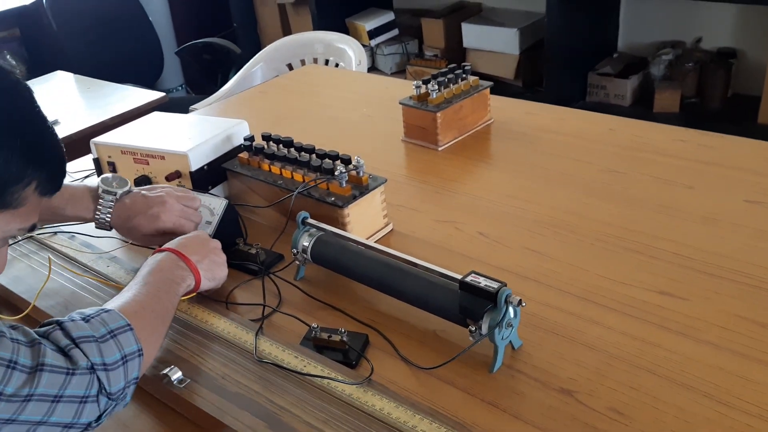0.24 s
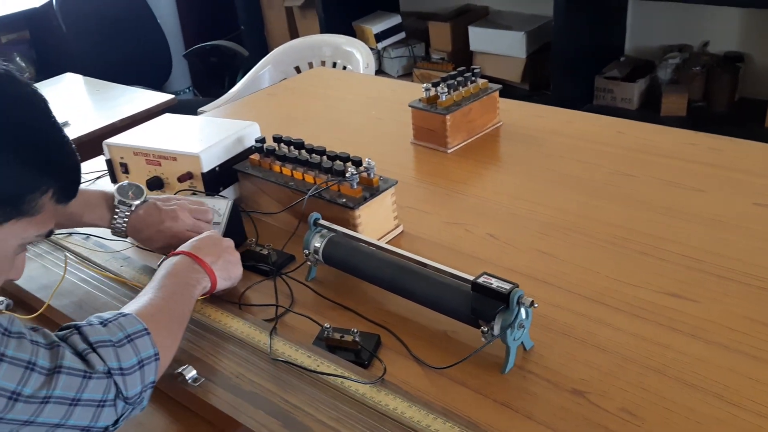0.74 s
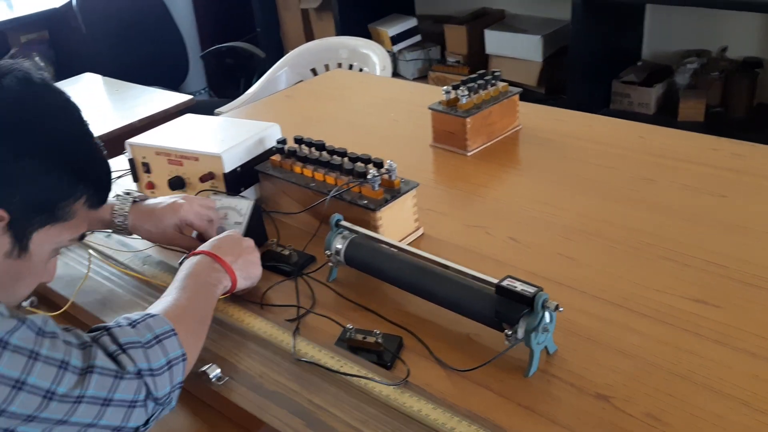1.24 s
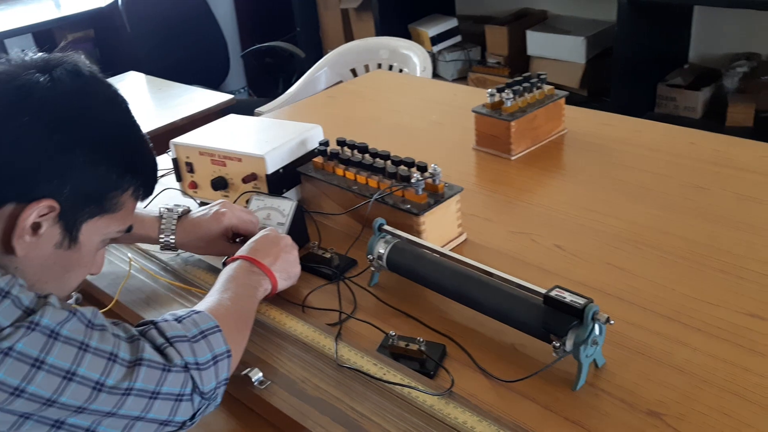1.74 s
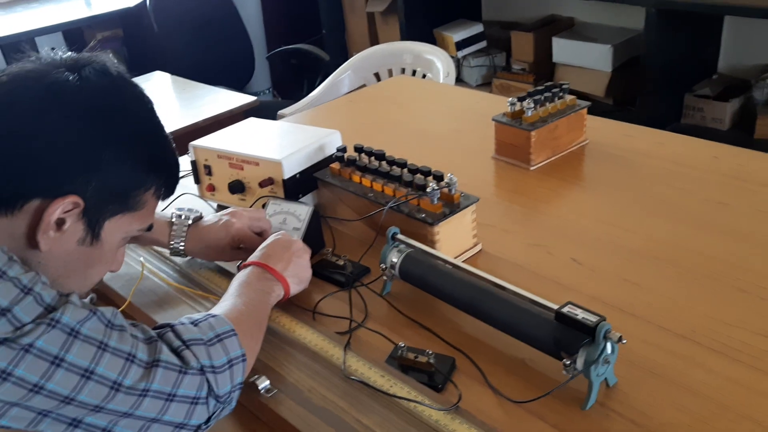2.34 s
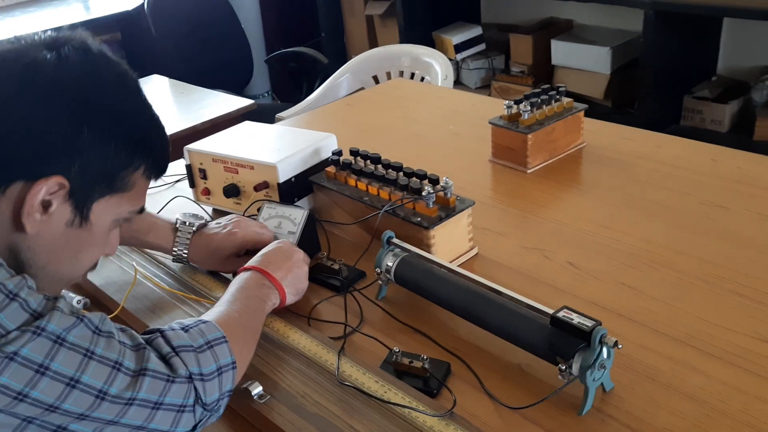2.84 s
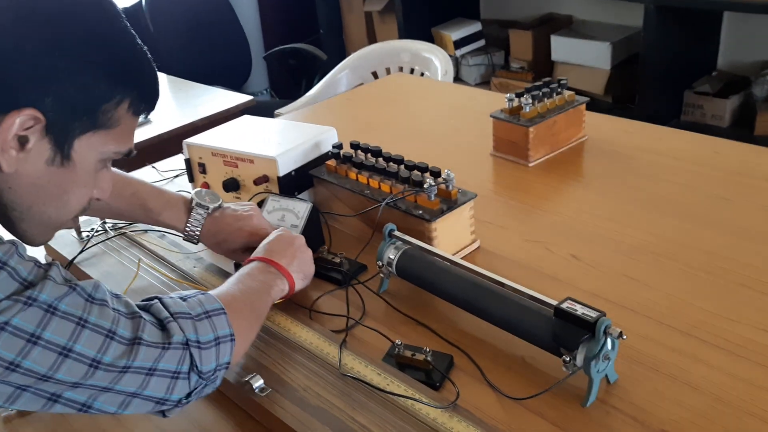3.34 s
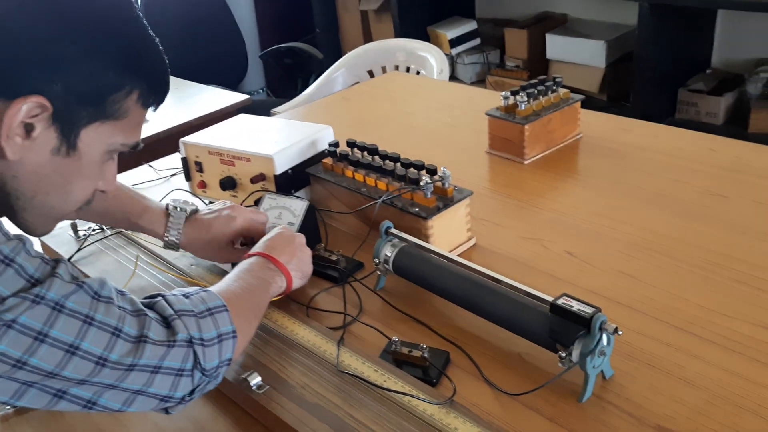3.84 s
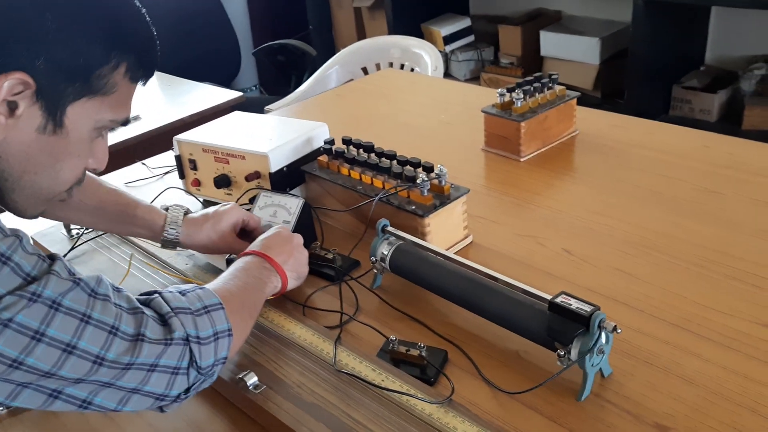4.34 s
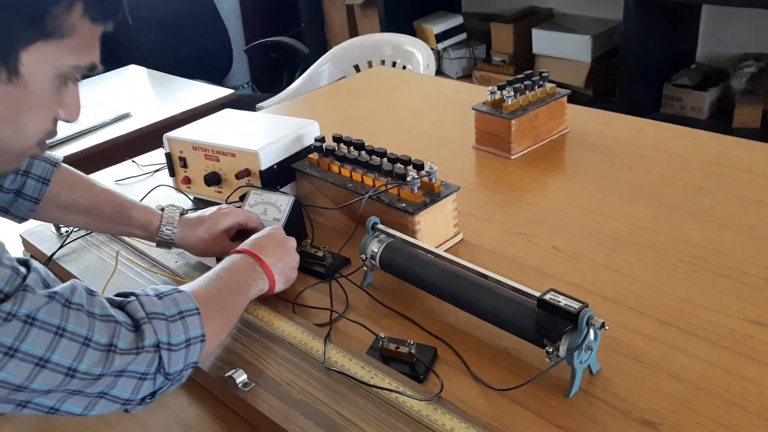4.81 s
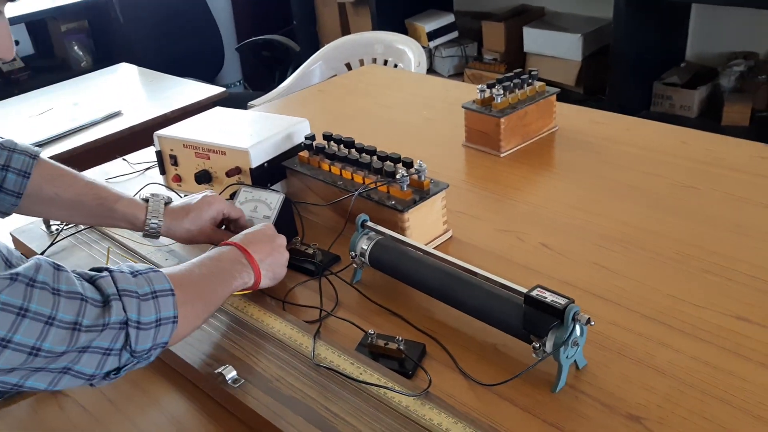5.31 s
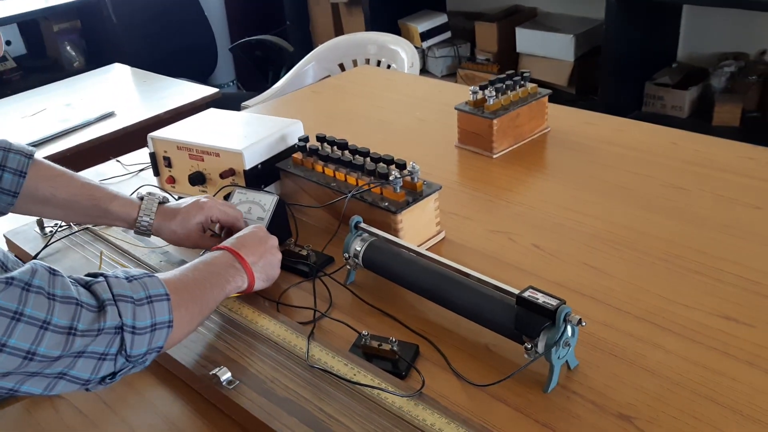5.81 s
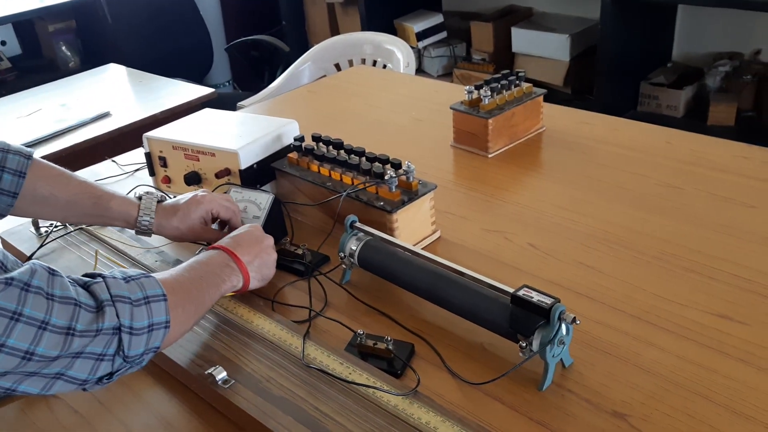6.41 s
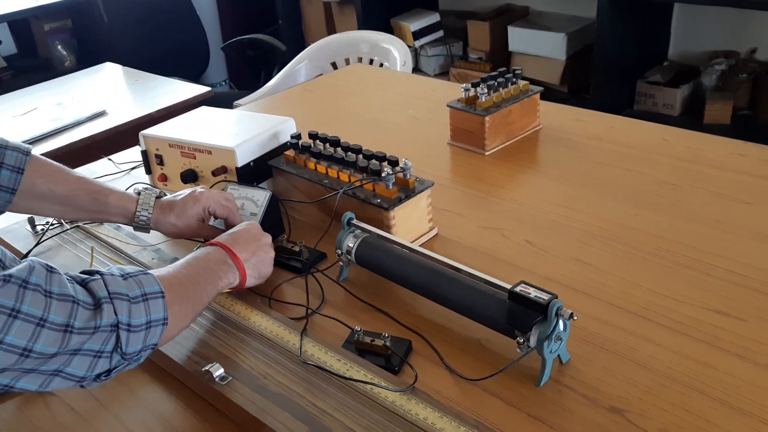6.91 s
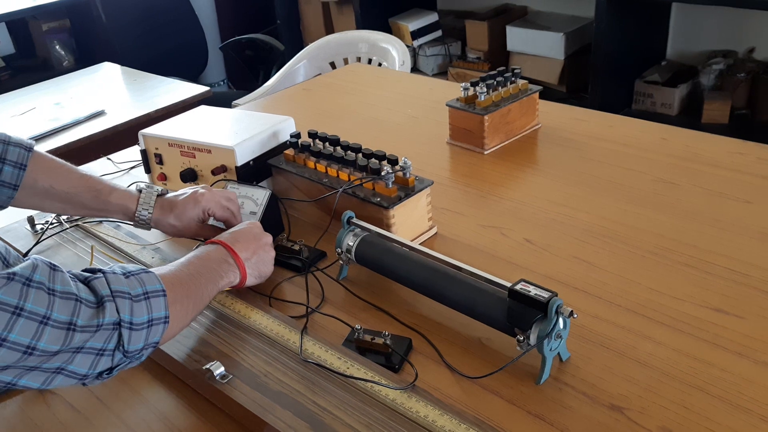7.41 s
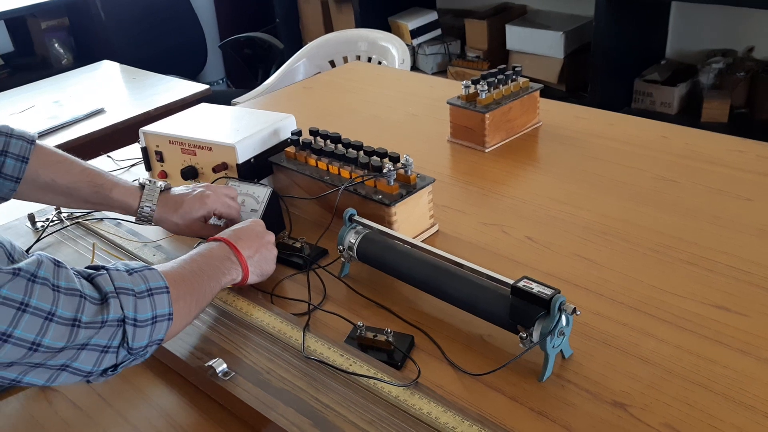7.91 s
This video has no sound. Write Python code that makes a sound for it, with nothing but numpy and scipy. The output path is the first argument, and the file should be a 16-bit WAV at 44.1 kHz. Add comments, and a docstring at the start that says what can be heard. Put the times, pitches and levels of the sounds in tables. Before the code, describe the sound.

Small metal clinks, wooden knocks and sleeve rustles as hands fit a wire, with one stool squeal and short rubber sole chirps.

```python
"""Hands fit a wire to a brass terminal on a wooden bench, near one microphone in a large bare laboratory.
Knuckles knock the boards, wire ends clink on the brass, sleeves rustle and arms drag, and each movement stirs a
low rumble. Down on the floor a stool leg squeals once and rubber soles chirp as they stick and slip. The far
walls answer the taps and squeaks; from outside comes a thin, distant squeal, over a steady hush."""
import sys
import numpy as np
from scipy import signal
from scipy.fft import rfft, irfft
from scipy.io import wavfile
from scipy.ndimage import uniform_filter1d

SR = 44100
rng = np.random.default_rng(int(sys.argv[2]) if len(sys.argv) > 2 else 0)


def to_wav(s):
    """Save 16-bit WAV."""
    ch = np.atleast_2d(s).T  # columns
    pcm = np.round(np.clip(ch, -1, 1) * 32767)  # PCM
    wavfile.write(sys.argv[1], SR, pcm.astype(np.int16))


N = 359415
T = np.arange(N) / SR

# wire ends on the terminal: t/s, clink level/dB, clink centre f/Hz, snap level/dB, top level/dB
WIRE_CLICKS = [(.1, -41.5, 1580, -46, -76), (0.3027, -62, 1570, -65.5, -65), (0.698, -24.5, 1800, -52, -55),
               (1.254, -45, 1650, -72, -80), (1.589, -63, 1846, -61, -66),
               (1.6103, -45, 1680, -42.5, -32.5), (1.649, -60, 1734, -62, -75),
               (1.7743, -60, 1683, -62, -78), (1.945, -60, 1985, -57, -62),
               (1.9693, -61, 2600, -48.5, -43.5), (2.092, -53, 2370, -46.5, -65),
               (2.2876, -59.5, 1657, -61, -75.5), (2.6905, -43, 1740, -39.5, -64),
               (2.7048, -44, 1603, -55, -54), (2.7214, -47, 1630, -45, -58),
               (2.811, -49.5, 2260, -62.5, -77.5), (3.1908, -67.5, 1840, -69, -70),
               (3.3565, -56, 2060, -58.5, -49), (3.411, -64, 2127, -61, -55.5),
               (3.4793, -49.5, 1810, -61, -54.5), (3.5354, -72, 1800, -65.5, -50.5),
               (3.6029, -57.5, 2400, -82, -90), (3.714, -59, 1940, -72.5, -60),
               (3.884, -49, 2780, -72, -83.5), (4.087, -61, 1997, -81.5, -88),
               (4.112, -55.5, 2690, -88, -85), (4.375, -51, 1850, -71, -73),
               (4.722, -70, 1564, -64.5, -59.5), (4.7587, -71, 2065, -64.5, -72),
               (4.8694, -62.5, 2110, -72.5, -84), (5.067, -55, 2600, -85, -69.5),
               (5.1363, -53, 2260, -62, -56), (5.2095, -44.5, 1750, -58, -62), (5.431, -49, 1910, -71, -70),
               (5.4524, -70, 1600, -65, -71), (5.7166, -39, 2200, -49, -74), (5.7446, -49, 2137, -58, -77),
               (5.7734, -70, 2160, -59, -76.5), (6.11, -56, 2100, -75, -85),
               (6.2637, -60.5, 2190, -63, -89), (6.409, -59.5, 1910, -71.5, -85),
               (6.5121, -64, 2120, -81.5, -88), (6.5595, -62, 2272, -74, -84),
               (7.0445, -60.5, 2043, -76, -76.5), (7.3144, -61.5, 1960, -68.5, -58),
               (7.3627, -62, 2226, -78.5, -63), (7.4988, -61, 1600, -76, -85),
               (7.5565, -55, 2215, -67.5, -69.5), (7.9455, -69, 2170, -78, -65.5),
               (8.053, -47, 2170, -58.5, -72)]
# low and high modes of the brass: f/Hz, level/dB, t60/s
BRASS_LOW_MODES = [(1600, 0.5, 0.013), (1805, 2, .025), (2165, 0.5, .04), (2540, -2.5, 0.0072),
                   (2860, 1, 0.016)]
BRASS_HIGH_MODES = [(4300, -1, .004), (4820, 2, .005), (5500, 2, .005), (6318, 0, .004), (7940, -4, .004)]


def terminal_clicks():
    """Near the microphone, wire ends strike brass: ringing modes and short cracks of noise."""
    s, clink_db, clink_hz, snap_db, top_db = np.transpose(WIRE_CLICKS)
    at = np.round(s * SR).astype(int)
    clink = strike(at, clink_db - 1, BRASS_LOW_MODES, roll_s=.004, centre_hz=clink_hz, db_per_octave=36)
    clink += crack(at, clink_db - 1, t60=.03)
    snap = strike(at, snap_db, BRASS_HIGH_MODES, roll_s=.0038)
    snap += crack(at, snap_db + 10.5, t60=.025)
    top = crack(at, top_db + 5, t60=.012)
    return band(clink, 1100, 3300) + band(snap, 3600, 7300) + band(top, 9000, 16000)


# blows on the bench: t/s, thud level/dB, thud centre f/Hz, wood level/dB, wood centre f/Hz
BENCH_KNOCKS = [(.1, -35.5, 143, -37.5, 725), (0.3016, -68, 285, -53, 573),
                (0.3692, -56, 69.6, -67.5, 554.2), (.7, -35.5, 153, -30, 790),
                (0.9276, -57, 86, -44.5, 354), (1.252, -36, 283, -25.5, 483),
                (1.497, -48.5, 280, -39.5, 416), (1.589, -51, 285, -47.5, 596),
                (1.6104, -58, 283, -43.5, 710), (1.649, -56, 299, -37.5, 354), (1.702, -53, 165, -42, 1060),
                (1.773, -47.5, 100, -57, 653), (1.9696, -68, 274, -55.5, 449), (2.0699, -45, 135, -58, 414),
                (2.0907, -43.5, 144, -51, 520), (2.2891, -52.5, 261.2, -62.5, 322),
                (2.4493, -39, 266, -71, 305), (2.5299, -41, 264, -70, 337), (2.69, -27.5, 299, -24.5, 400),
                (2.7054, -23, 82, -47, 344), (2.72, -46, 61.6, -40, 377), (2.811, -37, 65, -35, 332),
                (2.9571, -47, 163, -46.5, 386), (3.1528, -58, 153, -53, 342.4),
                (3.1899, -50.5, 74.3, -54.5, 369), (3.335, -55, 182, -45, 480), (3.4423, -58, 70, -42, 575),
                (3.8812, -46.5, 149, -46.5, 358), (4.086, -59, 273, -54.5, 628),
                (4.1116, -54, 286, -51, 533), (4.376, -59, 295, -45.5, 520), (4.721, -46, 152.4, -61, 319),
                (4.7587, -47, 107, -64, 304), (4.8687, -50.5, 108, -57, 646), (5.1363, -52, 70, -45, 550),
                (5.2099, -53.5, 94, -50, 657), (5.422, -56, 131.3, -36.5, 520),
                (5.4524, -53, 167, -42, 614), (5.7164, -55, 212, -52, 986), (5.745, -47, 129, -47, 475),
                (5.7734, -48.5, 113, -65, 450), (6.41, -70, 64.6, -53, 674), (6.5586, -51, 221, -53, 355),
                (6.5998, -53.5, 231, -57, 555), (7.0432, -59, 81, -55, 540), (7.363, -63, 67.7, -57.5, 454),
                (7.5569, -60.5, 189, -48, 534), (8.0514, -55, 210, -49.5, 610),
                (8.078, -53.5, 271, -45, 345)]
# low and middle modes of the bench: f/Hz, level/dB, t60/s
BENCH_LOW_MODES = [(61, -1, 0.24), (77, 0.5, 0.36), (97.9, -1.5, 0.29), (151, 3.5, 0.19), (198, -2, .12),
                   (214, -0.5, 0.09), (252.9, 2.5, 0.036), (288.2, 1, 0.14)]
BENCH_MID_MODES = [(330.6, 0.5, 0.07), (354, -2.5, 0.2), (417, -1.3, 0.099), (470, 1.8, 0.057),
                   (546.9, 2.4, .08), (610, -0.75, 0.088), (687, -1.4, 0.1), (795.4, 1.8, 0.05),
                   (874, -4.2, .06), (960.6, 0, 0.022), (1090, -0.2, 0.027)]


def bench_knocks():
    """Knuckles and apparatus knock the bench; the soft blows ring only the wood's modes."""
    s, thud_db, thud_hz, wood_db, wood_hz = np.transpose(BENCH_KNOCKS)
    at = np.round(s * SR).astype(int)
    thud = strike(at, thud_db - 1.5, BENCH_LOW_MODES, roll_s=.008, centre_hz=thud_hz, db_per_octave=12.5)
    wood = strike(at, wood_db - .5, BENCH_MID_MODES, roll_s=.002, centre_hz=wood_hz, db_per_octave=10.5)
    return band(thud, 40, 560) + band(wood, 310, 1400)


# sleeve and finger rubs: t/s, hold/s, cloth level/dB, finger level/dB, relative crackle level/dB
HAND_RUBS = [(0, 0.012, -69.5, -67.5, 4), (0.111, 0.0045, -68, -62.5, -12), (0.3, .005, -81.5, -90, .5),
             (0.506, 0.085, -80.5, -76, 9), (1.265, .005, -64.5, -65, -1), (1.598, 0.0048, -78.5, -79, 8.5),
             (1.96, 0.0046, -91.5, -74, -10), (2.099, 0.0022, -90, -80, -15),
             (2.108, 0.14, -79, -80.5, 0.5), (2.305, 0.027, -70.5, -76, 4.5), (2.7, 0.025, -64.5, -71, 0),
             (2.806, .045, -67, -67.5, -4), (2.952, 0.062, -70, -74.5, 1), (3.181, 0.012, -76.5, -72.5, -2),
             (3.265, 0.053, -63, -71, 6), (3.434, 0.21, -87.5, -85, 8), (4.346, 0.062, -80.5, -72, 2.5),
             (4.6, 0.29, -81, -83, 4), (5.11, 0.02, -67, -64.5, 0.5), (5.21, .01, -75, -65.5, 6.5),
             (5.42, .03, -80, -83, .5), (5.725, 0.029, -83, -81, -3), (5.962, 0.009, -86, -77, 0),
             (6.107, .005, -84, -71, -11), (6.681, .02, -85, -75.5, -0.5), (7.166, .01, -89, -77, 4),
             (7.319, 0.0046, -89, -81, 7.5), (7.555, 0.0049, -88, -82, -5), (8.031, 0.045, -80, -72.5, 7)]
# spectra of sleeve cloth and of crackling wire: f/Hz, density level/dB
CLOTH_SPECTRUM = [(1760, -42.5), (3000, -16), (3500, -1), (3800, -4.5), (4480, 0.5), (5860, 2),
                  (6460, -2.5), (7320, -1), (9500, -12.5), (12400, -40.5), (20900, -120)]
WIRE_SPECTRUM = [(6000, -27.5), (9000, -4.5), (12000, -2.5), (15800, 0)]


def rustle():
    """Close and dry: cloth rubs unevenly band by band, stiff wire crackles, fingers rub duller."""
    rest_db, rise_db_per_s, post_hz = -92.5, 1503.5, 2150
    s, hold_s, cloth_db, finger_db, crackle_db = np.transpose(HAND_RUBS)
    cloth = strokes(s, hold_s, cloth_db, rise_db_per_s, fall_db_per_s=189)
    skin = strokes(s, hold_s, finger_db, rise_db_per_s, fall_db_per_s=189)
    # every click on the terminal brings a brief rub too
    click_s, clink_db, _, snap_db, _ = np.transpose(WIRE_CLICKS)
    no_hold = np.zeros_like(click_s)
    brush = strokes(click_s, no_hold, snap_db - 21, rise_db_per_s, fall_db_per_s=300.5)
    touch = strokes(click_s, no_hold, clink_db - 18, rise_db_per_s, fall_db_per_s=300.5)
    rub = colour(grains(8000, spread_db=2.5), CLOTH_SPECTRUM)
    edges = np.geomspace(2600, 12000, 6)
    patchy = sum(amp(1.5 * drift(10)) * band(rub, low, high) for low, high in zip(edges, edges[1:]))
    crackle_gain = amp(loudest(cloth, crackle_db) - 13.5 + 1.7 * drift(25))
    crackle = crackle_gain * colour(grains(2500, spread_db=.5), WIRE_SPECTRUM)
    sleeves_and_wire = envelope(np.vstack([cloth, brush]), rest_db) * (rms_one(patchy) + crackle)
    dull = band(grains(3000, spread_db=2), 1250, 2800)
    post = amp(5) * resonate(dull, post_hz, width_hz=220)   # the terminal post colours the finger rubs
    fingers = envelope(np.vstack([skin, touch]), rest_db) * rms_one(dull + post)
    return amp(6.5) * sleeves_and_wire + fingers


# arms on the bench top: t/s, hold/s, level/dB, centre f/Hz
ARM_DRAGS = [(0, 0.0065, -47, 510), (.11, 0.049, -48.5, 450), (.75, 0.0077, -44.5, 780),
             (.91, 0.0057, -47.5, 406), (1.09, 0.098, -45, 265), (1.27, 0.1, -41.5, 330),
             (1.61, 0.063, -44.5, 420), (1.75, .05, -58, 450), (1.97, 0.15, -59.5, 350),
             (2.5, 0.092, -49.5, 265), (2.718, 0.12, -45, 397), (2.88, 0.15, -47, 340),
             (3.29, 0.091, -46.5, 612), (3.412, 0.057, -48, 630), (3.58, 0.22, -61, 450),
             (3.88, 0.076, -59, 300), (4.08, 0.068, -66.5, 570), (4.36, 0.025, -52, 480),
             (4.56, 0.17, -63, 280), (4.88, 0.008, -64, 447), (5.02, 0.054, -64, 600),
             (5.127, 0.09, -56, 590), (5.324, .05, -58.5, 600), (5.417, 0.055, -53.5, 595),
             (5.72, 0.075, -61, 470), (6.082, .12, -55.5, 577), (6.45, .13, -60, 400),
             (6.74, .01, -61, 362), (7.04, 0.058, -69.5, 560), (7.6, 0.0088, -64, 560),
             (7.88, .03, -60.5, 320), (8.029, .07, -55, 607)]


def arm_drags():
    """Arms drag on the bench near the microphone; the boards under them colour the rub."""
    s, hold_s, level_db, centre_hz = np.transpose(ARM_DRAGS)
    power = strokes(s, hold_s, level_db, rise_db_per_s=192, fall_db_per_s=131)
    drag_hz = loudest(power, centre_hz)
    rub = grains(3000, spread_db=2)
    edges = np.geomspace(190, 1300, 9)
    gains = [amp(-16 * np.abs(np.log2(low * 1.2 / drag_hz))) for low in edges[:-1]]
    drag = sum(gain * rms_one(band(rub, low, high)) for gain, low, high in zip(gains, edges, edges[1:]))
    drag /= np.sqrt(sum(gain ** 2 for gain in gains))
    return envelope(power, rest_db=-72.5) * amp(1.7 * drift(2.1)) * drag


# the stool leg's slide: t/s, slip f/Hz, squeal level/dB, frame level/dB, grit level/dB
STOOL_SLIDE = [(.54, 1800, -83, -70.5, -83), (.585, 1800, -70, -48.5, -67), (.61, 1800, -46, -29.5, -51),
               (.63, 1800, -24.5, -33.5, -40.5), (.655, 1800, -20, -35.5, -32),
               (.686, 1795, -21.5, -31, -35), (.693, 1790, -50, -28.5, -47.5),
               (.715, 1790, -71.5, -33.5, -51), (.735, 1790, -67.5, -52, -63.5)]
# harmonics of the squeal: multiple, level/dB
SQUEAL_HARMONICS = [(1, -1.5), (2, -16.5), (3, -16), (4, -22.5)]
# resonances of the stool frame: f/Hz, width/Hz, level/dB
FRAME_MODES = [(593, 130, -4.5), (762.2, 80, 3), (855, 41, 4), (1067.6, 7, -3.5), (1595, 110, -3),
               (1730, 90, -22), (2000, 130, -5.5), (3540, 22, -15), (3872, 73, -10.5), (4260, 130, -16),
               (4690, 71, -13.5), (5750, 70, -10.5), (7600, 200, -23)]
# spectrum of grit under the leg: f/Hz, density level/dB
GRIT_SPECTRUM = [(1350, -42.5), (2300, -18), (2680, -20), (3480, -3), (5070, -7.5), (5530, -4.5),
                 (6090, -8.5), (9520, -20.5), (13200, -20.5), (15500, -29.5)]


def stool_squeal():
    """A stool leg sticks and slips at a near-steady rate; the rough floor grates and shakes the frame."""
    hz, squeal_db, frame_db, grit_db, on = in_time(STOOL_SLIDE)
    phase = 2 * np.pi * np.cumsum(hz * (1 + .0057 * drift(25))) / SR
    phase += .23 * rms_one(band(rng.standard_normal(N), 30, 400))   # uneven slips roughen overtones most
    squeal = np.sqrt(2) * sum(amp(db) * np.sin(k * phase) for k, db in SQUEAL_HARMONICS)
    shake = grains(900, spread_db=1)
    frame = sum(amp(db) * rms_one(resonate(resonate(shake, mode_hz, 2 * width), mode_hz, width))
                for mode_hz, width, db in FRAME_MODES)
    grit = colour(grains(9000, spread_db=-2.5), GRIT_SPECTRUM)
    return on * (amp(squeal_db) * squeal + amp(frame_db) * rms_one(frame) + amp(grit_db) * grit)


# soles on the floor, one list a chirp: t/s, f/Hz, level/dB, octave level/dB
SOLE_CHIRPS = [
    [(.042, 8500, -73, -90), (.044, 9000, -30, -80), (.0455, 9830, -39, -82), (.048, 9700, -51, -69.5),
     (.051, 9500, -70, -90)],
    [(.220, 8500, -77, -99), (.2235, 8050, -50, -90), (.226, 7460, -56, -87)],
    [(.707, 12700, -56, -95), (.7142, 12420, -15, -95), (.7175, 12150, -9, -95), (.7212, 11450, -17, -95),
     (.724, 11280, -12, -95), (.7265, 11270, -18, -95), (.729, 11270, -45, -95)],
    [(.832, 10860, -53.5, -80), (.8365, 9220, -16, -59), (.840, 7340, -23, -38), (.843, 6580, -34.5, -62)],
    [(4.570, 4770, -79.5, -91), (4.577, 4780, -68, -81), (4.585, 4940, -64, -93), (4.6, 4800, -68, -96.5),
     (4.615, 4770, -60.5, -92), (4.63, 4750, -73, -95)],
    [(4.585, 5250, -78, -97), (4.590, 5200, -60, -92), (4.603, 5660, -51, -80), (4.615, 5750, -38.5, -73.5),
     (4.624, 5480, -40, -72), (4.636, 5590, -46, -82)],
    [(5.1, 8650, -62, -90), (5.104, 8500, -29, -80), (5.109, 8620, -26, -70), (5.111, 8300, -31, -60),
     (5.1145, 8040, -12, -52), (5.117, 8050, -14, -48), (5.121, 7700, -9, -28), (5.1235, 7200, -22, -34),
     (5.125, 6900, -45, -55)],
    [(5.388, 8230, -46.5, -74.5), (5.393, 8030, -18.5, -57), (5.397, 7980, -24, -53),
     (5.400, 7680, -18.5, -41), (5.403, 6410, -36.5, -63)],
    [(5.672, 10500, -58, -95), (5.677, 10360, -41.5, -94), (5.688, 10600, -32.5, -95),
     (5.692, 10850, -32, -95)],
    [(6.113, 6700, -66, -95), (6.126, 7050, -56, -70), (6.13, 7000, -36, -48), (6.133, 6560, -21, -38),
     (6.1345, 6400, -32, -34), (6.1365, 6320, -31, -36), (6.142, 6050, -32, -46), (6.147, 5950, -50, -62)],
]


def sole_chirps():
    """Rubber sticks and slips on smooth floor: a gliding tone, with its octave when under 8500 Hz."""
    out = np.zeros(N)
    for rows in SOLE_CHIRPS:
        s, *columns = np.transpose(rows)
        span = slice(int(s[0] * SR), int(s[-1] * SR))
        hz, level_db, octave_db = (uniform_filter1d(np.interp(T[span], s, c), size=45) for c in columns)
        phase = 2 * np.pi * np.cumsum(hz) / SR
        tone = amp(level_db) * np.sin(phase)
        octave = amp(octave_db) * (hz < 8500) * np.sin(2 * phase)
        grip = signal.windows.tukey(len(hz), .2)
        out[span] += np.sqrt(2) * grip * (tone + octave)
    bench_echo = amp(-12) * np.roll(out, int(.0036 * SR))   # off the bench top into the microphone
    return out + bench_echo


# brief catches of a sole: t/s, f/Hz, level/dB
SOLE_PIPS = [(5.413, 4900, -66), (5.456, 5040, -56), (5.491, 5200, -63.5), (5.511, 5110, -62),
             (5.551, 5100, -63), (5.575, 5140, -77), (6.88, 7930, -73.5)]


def sole_pips():
    """A sole catches on the floor for an instant, on one pitch."""
    out, t = np.zeros(N), T[:800] - T[400]
    bell_curve = np.exp(-(t / .0018) ** 2)
    for s, hz, db in SOLE_PIPS:
        start = int(s * SR) - 400
        out[start:start + 800] += np.sqrt(2) * amp(db) * bell_curve * np.sin(2 * np.pi * hz * t)
    return out


# reverberation of the bare laboratory: f/Hz, t60/s, level/dB
ROOM_DECAY = [(60.6, 0.37, -10), (295.5, 0.81, -14), (900, 0.51, -2), (1790, 0.79, -9.5), (3573, 0.64, -8),
              (6250, 0.48, -6), (8900, 0.4, -12), (11980, 0.21, -12), (15500, 0.17, -9.5)]
# echo clusters from the far walls: t/s, level/dB over the tail
FAR_WALL_ECHOES = [(0.021, 0.5), (0.042, 4.5)]


def room_reverb(x):
    """The room's diffuse tail builds up, then dies band by band, swelling where far walls answer."""
    t, tail, build_up_s = T[:SR], np.zeros(SR), .012
    edges = 40 * 2 ** np.arange(0, 9.1, .5)
    white = rng.standard_normal((2, SR))
    for k, (low, high) in enumerate(zip(edges, edges[1:])):
        hz = np.sqrt(low * high)
        t60 = at_hz(ROOM_DECAY, hz)
        decay = amp(at_hz(ROOM_DECAY, hz, column=2) - 60 * t / t60)
        decay_energy = t60 * SR / np.log(1e6)
        tail += band(white[k % 2], low, high) * decay / np.sqrt(decay_energy)
    tail *= np.clip(t / build_up_s, 0, 1) ** 2
    tail *= amp(sum(db * np.exp(-((t - s) / .003) ** 2) for s, db in FAR_WALL_ECHOES))
    return signal.fftconvolve(x, tail)[:N]


# deep rumble through the floor: t/s, level/dB
FLOOR_RUMBLE = [(0, -56), (.25, -69), (.45, -65), (.85, -70), (.97, -69), (1.12, -59), (1.5, -77),
                (1.82, -66), (2.3, -71.5), (2.65, -73), (2.87, -48), (3.05, -73), (3.6, -62.5),
                (4.3, -74.5), (4.6, -65), (5.2, -80), (6.15, -65), (6.45, -80), (8.15, -75.5)]
# swells of low rumble as arms and bodies move at the bench: t/s, hold/s, level/dB
RUMBLE_SWELLS = [(0, 0.0089, -53.5), (.11, 0.065, -51), (.54, 0.012, -59.5), (.75, 0.0071, -46),
                 (.91, .01, -56.5), (1.18, .01, -49), (1.34, 0.011, -56), (1.63, .05, -66),
                 (1.88, .01, -61), (2.15, 0.011, -61), (2.79, .01, -37.5), (3.0, 0.17, -63),
                 (3.38, 0.0073, -55.5), (3.7, 0.0091, -62.5), (3.97, .1, -67.5), (4.36, .01, -60),
                 (4.56, .4, -57), (5.15, 0.037, -57), (5.54, 0.011, -55.5), (5.67, 0.0097, -57.5),
                 (5.92, 0.23, -54.5), (6.74, 0.013, -69), (7.5, .03, -67), (8.04, 0.028, -64)]


def low_rumble():
    """Low rumble at the microphone: a narrow deep band through the floor, and broader swells as arms and bodies
    move at the bench."""
    deep_db, _ = in_time(FLOOR_RUMBLE)
    deep = amp(deep_db + 2 * drift(5)) * rms_one(band(rng.standard_normal(N), 52, 56))
    power = strokes(*np.transpose(RUMBLE_SWELLS), rise_db_per_s=168.5, fall_db_per_s=142)
    swell_gain = envelope(power, rest_db=-75.5) * amp(2 * drift(8))
    return deep + swell_gain * rms_one(band(rng.standard_normal(N), 62, 210))


# squeal far outside: t/s, centre f/Hz, level/dB
FAR_SQUEAL = [(5.74, 5200, -61), (5.82, 5250, -71.5), (6.0, 5360, -69.5), (6.2, 5260, -65.5),
              (6.45, 5126, -74.5), (6.6, 5170, -72.5), (6.75, 4970, -73.5), (6.95, 4950, -110)]


def far_squeal():
    """A thin, wavering band of hiss in the distance: low-passed noise carried on a gliding tone."""
    hz, level_db, on = in_time(FAR_SQUEAL)
    slow = signal.sosfilt(signal.butter(2, 130, fs=SR, output="sos"), rng.standard_normal((2, N)))
    phase = 2 * np.pi * np.cumsum(hz) / SR
    return on * amp(level_db) * rms_one(slow[0] * np.sin(phase) + slow[1] * np.cos(phase))


# spectrum of the room tone: f/Hz, density level/dB
ROOM_TONE_SPECTRUM = [(15, -43), (25, -11.5), (82, -0.5), (284, -3), (324, -2.5), (449, -6.5), (691, -7.5),
                      (1250, -20.5), (2200, -24.5), (3490, -30.5), (9460, -34.5), (13100, -35.5),
                      (15800, -37)]


def room_tone():
    """The laboratory's steady hush at the microphone: faint noise, strongest in the bass."""
    return amp(-65) * colour(rng.standard_normal(N), ROOM_TONE_SPECTRUM)


def strike(at, blow_db, modes, roll_s, centre_hz=None, db_per_octave=0):
    """A contact rolls briefly, so each mode starts at its own instant; those near centre_hz ring most."""
    out = np.zeros(N)
    luck = rng.standard_normal((len(at), len(modes)))
    lateness = rng.random((len(at), len(modes)))
    for k, (hz, mode_db, t60) in enumerate(modes):
        away_db = 0 if centre_hz is None else -db_per_octave * np.abs(np.log2(hz / centre_hz))
        starts = at + (lateness[:, k] ** 2 * roll_s * SR).astype(int)
        clicks = np.zeros(N)
        clicks[starts] = amp(blow_db + mode_db + away_db + 2.8 * luck[:, k]) * np.sign(luck[:, k - 1])
        out += ring(clicks, hz, t60)
    return out


def ring(clicks, hz, t60):
    """A unit click sets a sine of height 1 ringing."""
    r, w = amp(-60 / (t60 * SR)), 2 * np.pi * hz / SR
    return signal.lfilter([0, np.sin(w)], [1, -2 * r * np.cos(w), r * r], clicks + 1e-18)


def crack(at, blow_db, t60):
    """A fast-dying burst of noise at each blow."""
    clicks = np.zeros(N)
    clicks[at] = amp(blow_db)
    decay = signal.lfilter([1], [1, -amp(-60 / (t60 * SR))], clicks + 1e-18)
    return decay * rng.standard_normal(N)


def grains(per_s, spread_db):
    """Friction as random clicks of uneven size; rms 1."""
    sizes = amp(spread_db * np.minimum(rng.exponential(1, N), 5)) * rng.choice([-1, 1], N)
    return rms_one(sizes * (rng.random(N) < per_s / SR))


def strokes(s, hold_s, peak_db, rise_db_per_s, fall_db_per_s):
    """Power of each stroke every 64 samples: it rises, holds and falls along straight lines in dB."""
    age_s = T[::64] - s[:, None]
    loss_db = rise_db_per_s * np.maximum(-age_s, 0)
    loss_db += fall_db_per_s * np.maximum(age_s - hold_s[:, None], 0)
    return amp(2 * np.maximum(peak_db[:, None] - loss_db, -200))


def envelope(power, rest_db):
    """Gain over time of all strokes above a resting level."""
    return np.interp(T, T[::64], np.sqrt(power.sum(axis=0) + amp(2 * rest_db)))


def loudest(power, column):
    """A column of the strokes over time, weighted by how loud each one is."""
    return np.interp(T, T[::64], column @ power / power.sum(axis=0))


def drift(rate_hz):
    """A slow random wander of spread 1, drawn 60 times a second."""
    knots = rng.standard_normal(int(N / SR * 60) + 2)
    r = np.exp(-2 * np.pi * rate_hz / 60)
    slow = rms_one(signal.lfilter([1], [1, -r], knots))
    return np.interp(T * 60, np.arange(len(slow)), slow)


def colour(x, spectrum):
    """Shape by a spectrum (f/Hz, level/dB); rms 1."""
    hz = np.maximum(np.arange(N // 2 + 1) * SR / N, 1)
    inside = (hz > spectrum[0][0] / 2) & (hz < spectrum[-1][0] * 2)
    return rms_one(irfft(rfft(x) * amp(at_hz(spectrum, hz)) * inside, N))


def resonate(x, hz, width_hz):
    """One resonance with a peak gain of 1."""
    r, w = np.exp(-np.pi * width_hz / SR), 2 * np.pi * hz / SR
    return signal.lfilter([(1 - r * r) / 2, 0, (r * r - 1) / 2], [1, -2 * r * np.cos(w), r * r], x)


def band(x, low_hz, high_hz):
    return signal.sosfilt(signal.butter(2, [low_hz, high_hz], "band", fs=SR, output="sos"), x)


def in_time(rows):
    """Columns over time, and a mask that is 1 only within the table."""
    s, *columns = np.transpose(rows)
    return [np.interp(T, s, c) for c in columns] + [(T >= s[0]) & (T <= s[-1])]


def at_hz(rows, hz, column=1):
    """A column interpolated over log frequency."""
    columns = np.transpose(rows)
    return np.interp(np.log(hz), np.log(columns[0]), columns[column])


def amp(db):
    return 10 ** (np.asarray(db) / 20)


def rms_one(x):
    return x / np.sqrt(np.mean(x ** 2) + 1e-20)


def scene():
    """One microphone at the bench feeds both channels; only taps and squeaks ring the room."""
    contacts = sole_chirps() + sole_pips() + bench_knocks() + terminal_clicks() + stool_squeal()
    background = room_tone() + room_reverb(contacts) + low_rumble()
    mono = contacts + arm_drags() + rustle() + far_squeal() + background
    return np.array([mono, mono])


def record(dry):
    """The microphone drops the deepest bass; the top is cut steeply at 16 kHz."""
    bass_cut = signal.sosfilt(signal.butter(4, 42, "high", fs=SR, output="sos"), dry)
    return signal.sosfilt(signal.ellip(12, .5, 70, 16000, fs=SR, output="sos"), bass_cut)


dry = scene()
out = record(dry)
to_wav(out)
```